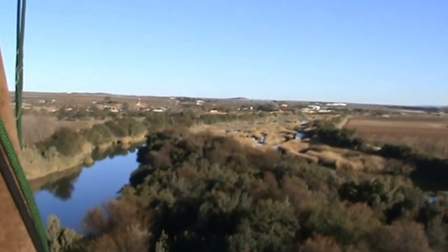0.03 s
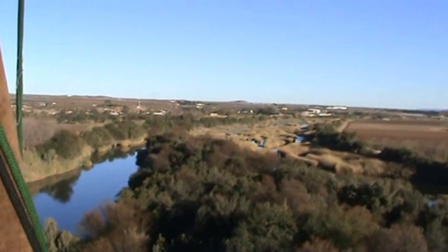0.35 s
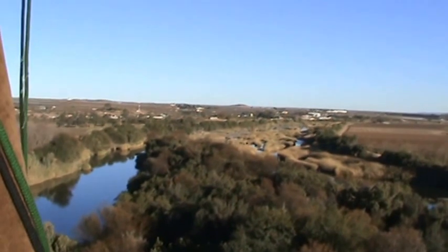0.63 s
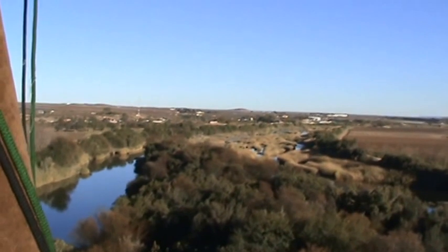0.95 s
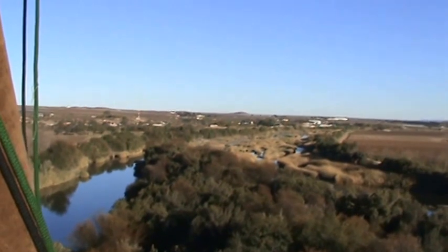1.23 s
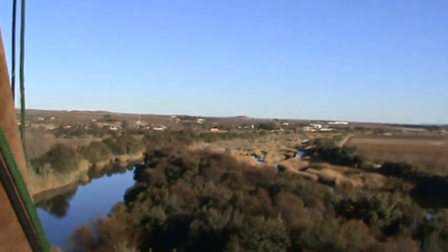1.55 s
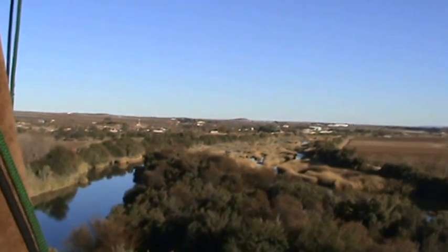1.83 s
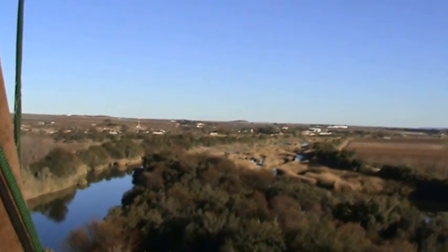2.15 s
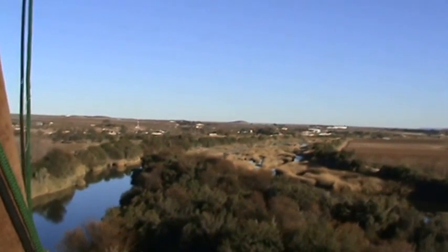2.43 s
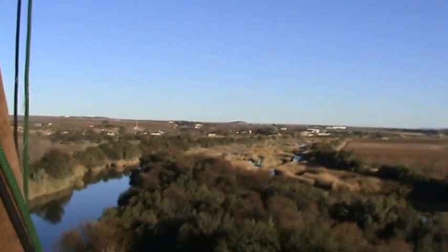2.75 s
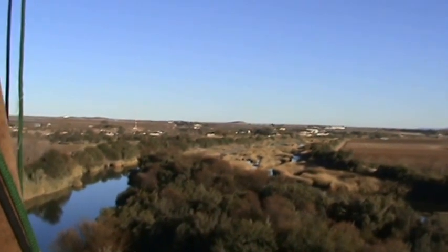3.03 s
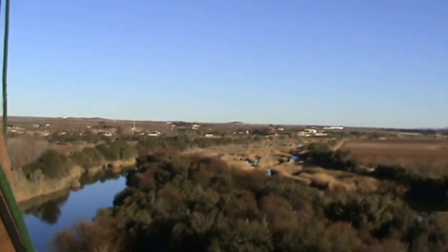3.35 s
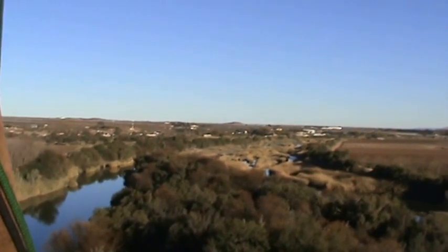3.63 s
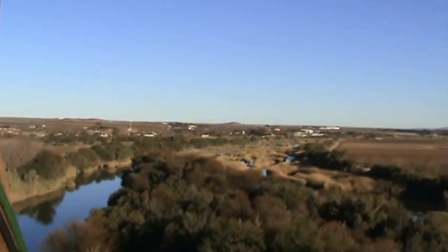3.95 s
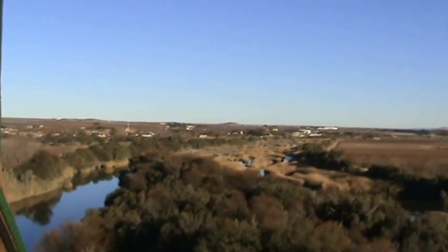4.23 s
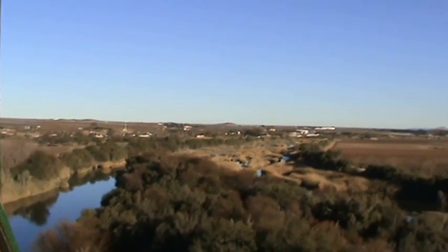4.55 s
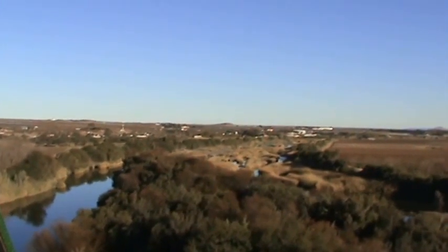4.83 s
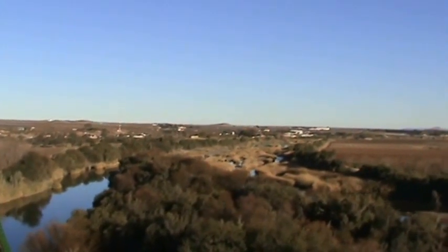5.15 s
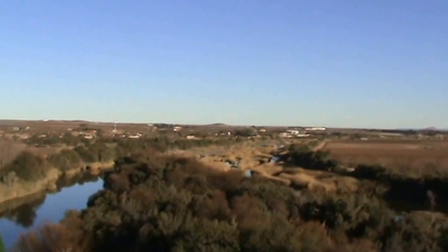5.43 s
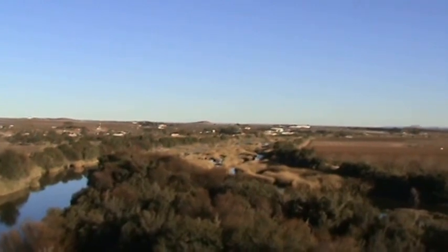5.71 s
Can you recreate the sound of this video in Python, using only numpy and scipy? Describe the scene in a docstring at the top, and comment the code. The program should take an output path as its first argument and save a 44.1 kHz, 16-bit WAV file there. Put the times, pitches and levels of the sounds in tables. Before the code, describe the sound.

A hot-air balloon's gas burner roars in two blasts overhead, then dies away to a faint flutter, rustles and small squeaks.

```python
"""A hot-air balloon's gas burner roars overhead, heard from the basket in calm open air.
One blast dies away and a small puff follows. The burner relights with two thumps, roars for over
two seconds and is shut off. The flow of gas drives the jet's hiss and the flame's roar and rumble.
In the quiet, the small pilot flame flutters. Near the end come faint rustles, squeaks and scuffs,
as of fabric, ropes and wicker, and a thin whistle."""
import sys
import numpy as np
from scipy import signal
from scipy.fft import rfft, irfft
from scipy.io import wavfile

SR = 44100
rng = np.random.default_rng(int(sys.argv[2]) if len(sys.argv) > 2 else 0)


def master(y):
    """Save y as 16-bit WAV."""
    cut = np.clip(np.atleast_2d(y).T, -1, 1)
    pcm = np.round(cut * 32767)  # scale
    wavfile.write(sys.argv[1], SR, pcm.astype(np.int16))


N = 259290
TIME = np.arange(N) / SR
FREQ = np.maximum(np.fft.rfftfreq(N, 1 / SR), 1)

# The tone colour of each noise. Each row: frequency in Hz, relative strength there in dB.
SCUFF_COLOUR = [(150, -11.5), (500, -2), (1400, -2), (3200, -6), (6000, -26)]
RUSTLE_COLOUR = [(600, -25.5), (1200, -3.5), (1600, -8.5), (2800, -1), (3300, -5.5), (3700, -1), (5300, -5),
                 (7200, -0.5), (9300, -6.5), (10300, -8), (12400, -9.5), (14500, -27), (15700, -16)]
PILOT_COLOUR = [(20, -14), (60, -5.5), (130, -1.5), (220, -3), (320, -4), (450, -4), (680, -3.5),
                (900, -18), (1300, -13), (2500, -16.5), (8000, -48.5)]
RUMBLE_COLOUR = [(12, -36), (28, -21.5), (45, -11), (62, -6.5), (95, -5.5), (135, -0.5), (175, -4),
                 (225, 2), (290, -8.5), (420, -17), (900, -57.5)]
ROAR_COLOUR = [(130, -37), (300, -1.5), (355, -2.5), (510, -1), (590, -3), (700, -3.5), (850, -10),
               (1120, -12), (1520, -17), (1700, -15), (2100, -21), (4000, -51)]
JET_COLOUR = [(700, -28), (1500, -8.5), (2100, -7), (2350, 0), (3500, -0.5), (5300, -2.5), (7000, -1),
              (9300, -6), (10100, -10), (12400, -8.5), (14500, -20), (15700, -17)]
# Dull scrapes. Each row: start in seconds, length in seconds, level in dB.
SCUFF_EVENTS = [(4.515, .045, -63), (5.551, 0.042, -62.5)]
# Squeaky rubs. Each row: start in seconds, length in seconds, level in dB, pitch in Hz,
# change to the overtones in dB.
SQUEAK_EVENTS = [(4.524, .05, -65, 2050, -8), (4.819, 0.032, -53.5, 2127, -2),
                 (4.863, 0.15, -62, 2134, -10), (5.007, 0.056, -57.5, 2150, -5),
                 (5.07, .145, -59, 2135, -9), (5.22, 0.15, -64, 2090, -4), (5.37, .1, -61.5, 2070, -8)]
# The tones that ring in a squeak. Each row: multiple of the pitch, width in Hz, level in dB.
SQUEAK_TONES = [(.9, 110, -10.5), (1, 50, -2.5), (1.056, 70, -14), (1.77, 100, -14), (1.92, 90, -8),
                (2.07, 90, -6.5)]
# Rustling movements. Each row: start in seconds, length in seconds, level at the end in dB.
RUSTLE_STROKES = [(3.882, 0.68, -64), (4.65, .6, -58), (5.275, 0.29, -57.5), (5.636, .25, -56.5)]
# The flame catches or goes out. Each row: start in seconds, peak level in dB, pitch in Hz.
FLAME_THUMPS = [(0.601, -26, 104.3), (0.844, -38.5, 75), (.963, -10.5, 95), (0.996, -4, 71.4)]
# Blasts of gas. Each row: when the valve opens, how long the flow takes to rise, when it ends,
# how long it takes to run down (all in seconds), level in dB.
GAS_BLASTS = [(-1, .07, 0.61, 0.79, -1), (0.817, .018, 0.853, 0.014, -28), (0.94, .062, 3.77, 0.81, 0)]
# How the two sides differ. Each row: frequency in Hz, how far the left leads in radians,
# left minus right level in dB, how alike the sides are from 0 to 1.
STEREO_IMAGE = [(30, 0.56, 2.5, 0.67), (70, 0.49, -0.6, 0.94), (150, 0.92, 1, 0.86), (348, 1.52, 1.5, 0.92),
                (684, 1.37, 3.5, 0.87), (1390, 0.93, 3.5, 0.92), (2800, 0.6, 3.5, 0.91),
                (7000, 0.68, 3.5, 1), (9600, 0.62, 0.2, 0.83), (10040, 1.6, 0, 0.5), (12350, 2.7, 3, 0.98),
                (14000, 2.94, 2.5, 0.66), (15300, 0.04, -1, 0.92)]


def gain(db):
    """Turn decibels into a number to multiply by."""
    return 10 ** (np.asarray(db) / 20)


def over_frequency(table, column=1):
    """Join the points of one table column with straight lines on a log-frequency axis."""
    rows = np.array(table, float)
    return np.interp(np.log(FREQ), np.log(rows[:, 0]), rows[:, column])


def shaped_noise(response):
    """Noise with the given strength at each frequency, scaled to an average (rms) size of 1."""
    sound = irfft(rfft(rng.standard_normal(N)) * response, N)
    return sound / np.sqrt(np.mean(sound ** 2))


def noise(colour):
    """Noise with the tone colour from a table."""
    return shaped_noise(gain(over_frequency(colour)))


def flutter(rate_hz):
    """A random wobble, mostly slower than the given rate."""
    return shaped_noise(1 / (1 + (FREQ / rate_hz) ** 4))


def resonance(hz, width_hz):
    """A narrow peak that lets through the frequencies near one pitch."""
    return 1 / (1 + (2 * (FREQ - hz) / width_hz) ** 2)


def stroke(start, length, rise_s, fade_s):
    """The loudness of one movement: it rises, holds and fades."""
    rise = np.clip((TIME - start) / rise_s, 0, 1)
    return rise * np.exp(-np.maximum(TIME - start - length, 0) / fade_s)


def filtered(sound, response):
    """Change the strength and timing of each frequency in a sound."""
    middle = N // 2
    return signal.fftconvolve(sound, np.roll(irfft(response, N), middle))[middle:middle + N]


def reflections(die_away_s=0.09, echo_db=-11, above_hz=700):
    """Direct sound plus short echoes off the basket and burner frame; low sounds pass them by."""
    tail = rng.standard_normal(N) * np.exp(-np.log(1000) * TIME / die_away_s) * (TIME > 0.002)
    tail /= np.sqrt(np.sum(tail ** 2))
    return 1 + gain(echo_db) * rfft(tail) * FREQ / (FREQ + above_hz)


def hear_in_basket(shared, spread):
    """Both sides hear the shared sound; the spread is added left and subtracted right for width."""
    lead, pan_db, likeness = (over_frequency(STEREO_IMAGE, column) for column in (1, 2, 3))
    apart = (1 - np.clip(likeness, 0, 1)) / 2
    echoes = reflections()
    channels = []
    for side in (1, -1):  # left, then right
        balance = np.sqrt(2 / (1 + gain(-side * pan_db) ** 2))
        path = echoes * balance * np.exp(0.5j * side * lead)
        centre = filtered(shared, path * np.sqrt(1 - apart))
        width = filtered(spread, path * np.sqrt(apart))
        channels.append(centre + side * width)
    return np.array(channels)


def whistle(start_s=4.4, rise_s=1.6, level_db=-67.5):
    """A faint, thin tone creeps in after the last blast."""
    tone = shaped_noise(resonance(hz=3680, width_hz=22))
    return tone * gain(level_db) * np.clip((TIME - start_s) / rise_s, 0, 1)


def scuffs():
    """Brief dull scrapes, as of wicker."""
    loudness = sum(gain(db) * stroke(start, length, rise_s=0.006, fade_s=0.015)
                   for start, length, db in SCUFF_EVENTS)
    return noise(SCUFF_COLOUR) * loudness


def squeaks(catch_db=0.6):
    """Uneven slips, as of ropes, make a few tones ring; a sharp tug brings out the upper ones."""
    out = np.zeros(N)
    for start, length, db, hz, overtones_db in SQUEAK_EVENTS:
        ringing = sum(gain(tone_db + overtones_db * (ratio > 1.5)) * resonance(ratio * hz, width)
                      for ratio, width, tone_db in SQUEAK_TONES)
        out += gain(db) * stroke(start, length, rise_s=0.005, fade_s=0.015) * shaped_noise(ringing)
    return out * gain(catch_db * flutter(35))


def rustle(rest_db=-64, swell_db=3, grain_db=2.1, snag_db=0.5):
    """A grainy sliding hiss, as of fabric. Over a faint base, each stroke swells, snags and stops."""
    power = gain(rest_db) ** 2
    for start, length, db in RUSTLE_STROKES:
        to_go = np.clip(1 - (TIME - start) / length, 0, 1)
        loudness = gain(db - swell_db * to_go) * stroke(start, length, rise_s=0.027, fade_s=0.025)
        power = power + loudness ** 2
    hiss = noise(RUSTLE_COLOUR) * np.sqrt(power)
    return hiss * gain(grain_db * flutter(150) + snag_db * flutter(18))


def pilot_flame(level_db=-60.5, flicker_db=1.0):
    """The small flame that always burns, fluttering softly."""
    return noise(PILOT_COLOUR) * gain(level_db + flicker_db * flutter(14))


def thumps(decay_s=0.0035, low_cut_hz=35):
    """A pocket of gas burns all at once: one swing of air pressure and a weak rebound."""
    out = np.zeros(N)
    for start, db, hz in FLAME_THUMPS:
        age = np.maximum(TIME - start, 0)
        swing = -np.sin(2 * np.pi * hz * age) * np.exp(-age / decay_s)
        out += gain(db) * swing / np.abs(swing).max()
    # Open air holds no steady pressure, so the slowest part is taken out.
    return signal.sosfilt(signal.butter(1, low_cut_hz, "high", fs=SR, output="sos"), out)


def follow_gas(level_db, saturation, lag_s, fresh_db, settle_s, sag_db_per_s=0.56, trickle=0.024):
    """The loudness of one burner sound: it trails the gas flow, which rises, holds and runs down."""
    loudness = np.zeros(N)
    for opens, rise_s, ends, fall_s, db in GAS_BLASTS:
        age = np.maximum(TIME - opens, 0)
        # The last of the gas trickles out softly.
        remaining = trickle * np.logaddexp(0, (ends - TIME) / fall_s / trickle)
        flow = np.clip(np.minimum(age / rise_s, remaining), 0, 1)
        # A fresh flame starts louder or softer; the gas pressure sags while the valve is open.
        strength = gain(level_db + db + fresh_db * np.exp(-age / settle_s) - sag_db_per_s * age)
        # The further saturation is from zero, the sooner the sound levels off as the flow grows.
        loudness += strength * np.tanh(saturation * flow) / np.tanh(saturation)
    memory = np.exp(-1 / (lag_s * SR))  # smoothing makes the sound lag behind the flow
    return signal.lfilter([1 - memory], [1, -memory], loudness, zi=[memory * loudness[0]])[0]


def burner():
    """Big billows shake the flame's rumble, small swirls roughen its roar, boiling fuel spits."""
    billows, swirls, spits = flutter(20), flutter(70), flutter(260)
    rumble = noise(RUMBLE_COLOUR) * gain(0.94 * billows)
    roar = noise(ROAR_COLOUR) * gain(0.16 * swirls + 0.25 * billows)
    jet = noise(JET_COLOUR) * gain(0.48 * spits + 0.36 * swirls + 0.33 * billows)
    rumble *= follow_gas(level_db=-18, saturation=1.65, lag_s=0.0432, fresh_db=8, settle_s=0.06)
    roar *= follow_gas(level_db=-13.5, saturation=1.6, lag_s=0.015, fresh_db=-4, settle_s=0.09)
    jet *= follow_gas(level_db=-20, saturation=-0.12, lag_s=0.0219, fresh_db=-1, settle_s=0.1)
    return rumble + roar + jet


def scene():
    """Flames and rustle are wide, so they are made twice; each small sound comes from one spot."""
    shared, spread = (burner() + pilot_flame() + rustle() for _ in range(2))
    return hear_in_basket(shared + thumps() + squeaks() + scuffs() + whistle(), spread)


def record(dry, ceiling=0.64, top_hz=15800):
    """Round off the loudest peaks on both sides together, then cut the highest treble."""
    pressure = np.sqrt(np.mean(dry ** 2, axis=0))
    rounded = dry / (1 + (pressure / ceiling) ** 4) ** (1 / 4)
    treble_cut = signal.ellip(12, 0.2, 80, top_hz, fs=SR, output="sos")
    return signal.sosfilt(treble_cut, rounded)


dry = scene()
out = record(dry)
master(out)
```